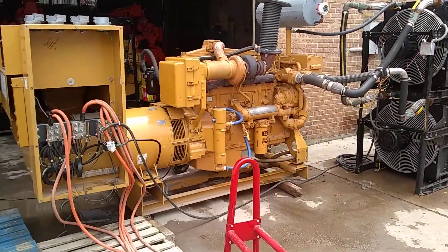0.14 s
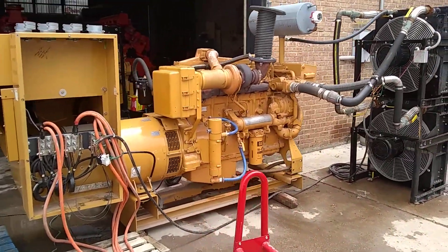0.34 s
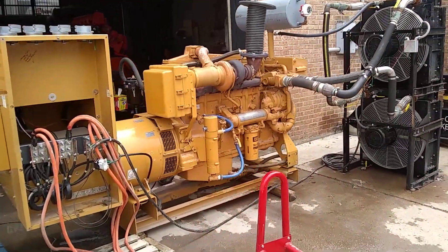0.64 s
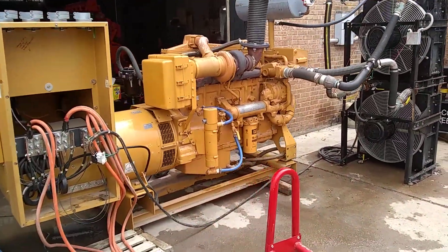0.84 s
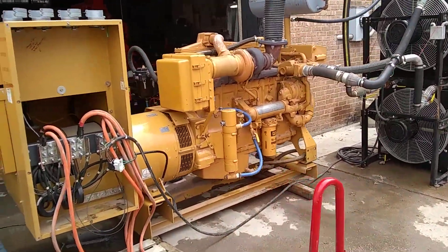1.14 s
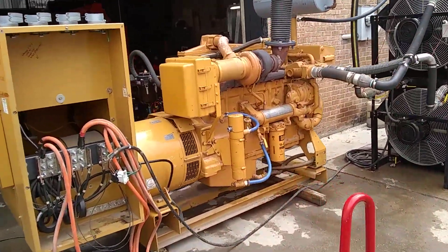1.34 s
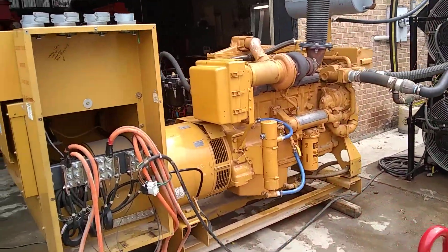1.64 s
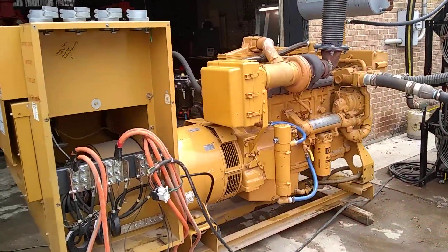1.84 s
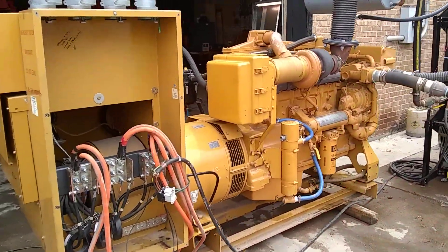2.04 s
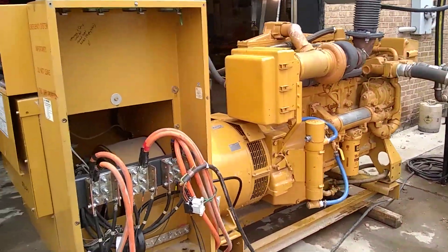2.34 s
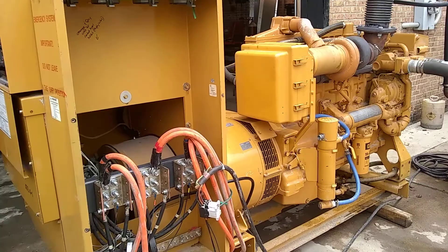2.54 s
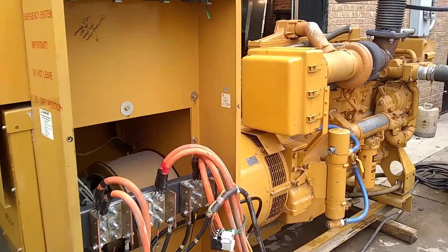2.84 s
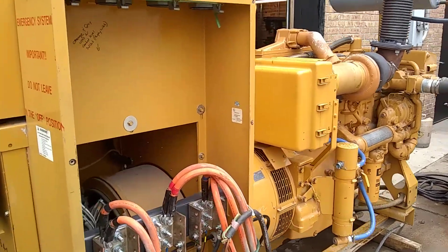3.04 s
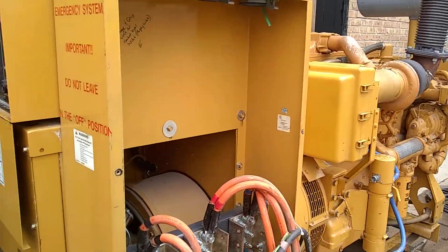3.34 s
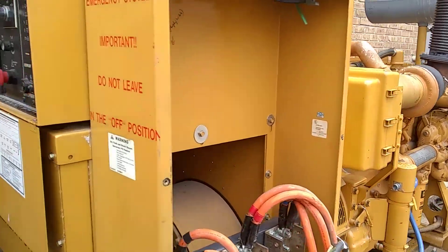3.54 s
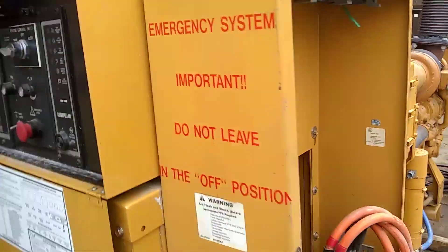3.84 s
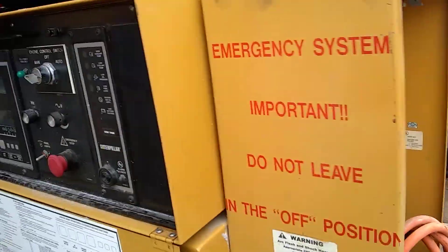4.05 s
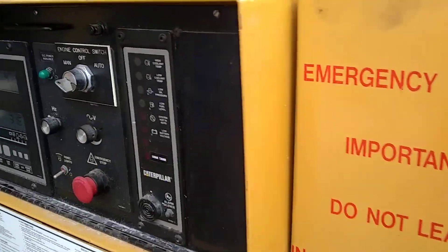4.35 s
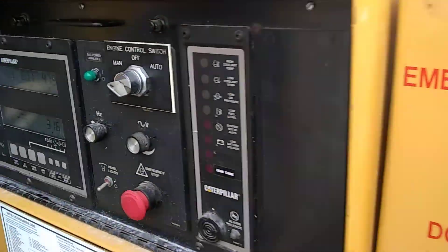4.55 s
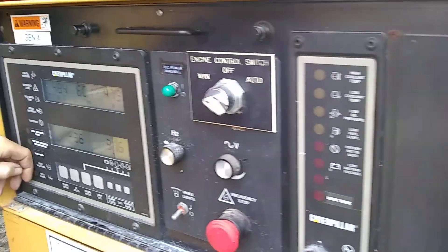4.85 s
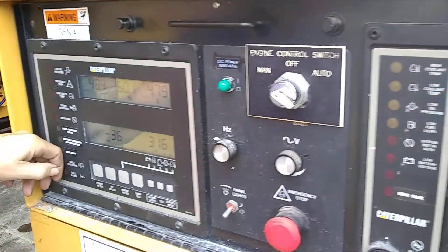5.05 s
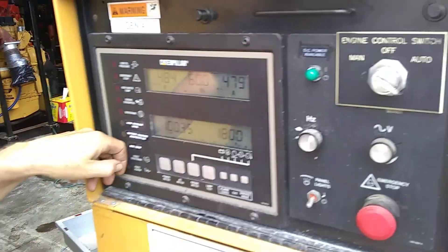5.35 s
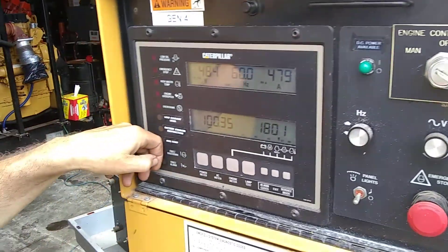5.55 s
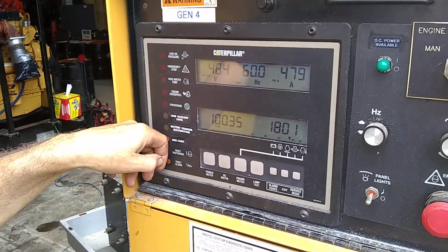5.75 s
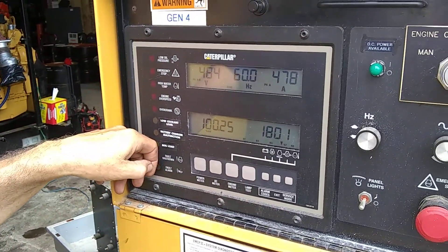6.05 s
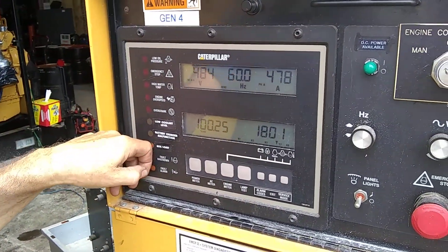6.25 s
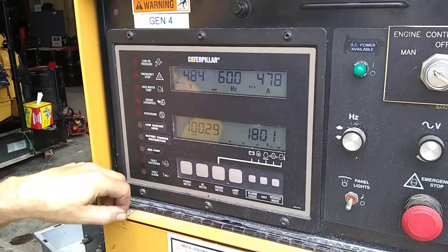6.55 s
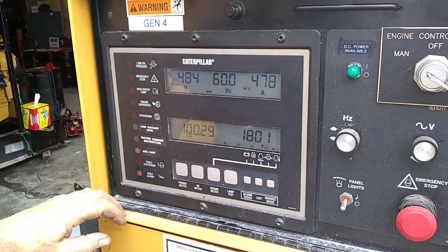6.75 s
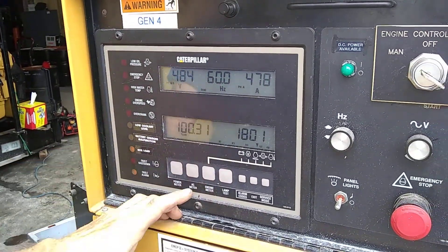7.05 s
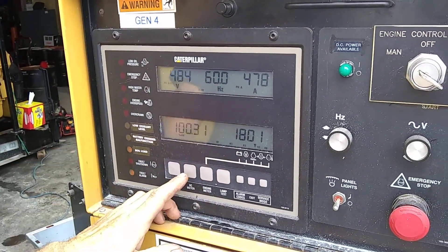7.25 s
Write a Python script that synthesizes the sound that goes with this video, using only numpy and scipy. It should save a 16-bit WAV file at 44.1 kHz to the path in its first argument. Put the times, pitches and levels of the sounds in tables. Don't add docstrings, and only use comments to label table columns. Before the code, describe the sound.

Continuous, very loud diesel engine under load, heard close outdoors on a small handheld stereo device. Deep buzzing drone wavers in strength during the walk, over fluttering mechanical roar, knocking clatter and wide airy hiss. High turbo whoosh is clearest first and dwindles; a boxy resonance swells midway; afterwards a steadier metallic hum leans left. The crests distort and the highest treble is cut off.

```python
import sys
import numpy as np
from scipy import signal
from scipy.fft import rfft, irfft, next_fast_len
from scipy.io import wavfile
from scipy.ndimage import uniform_filter1d, map_coordinates

SR = 44100
rng = np.random.default_rng(int(sys.argv[2]) if len(sys.argv) > 2 else 0)


def boost_factor(decibels):
    exponent = np.asarray(decibels, float) / 20
    return 10 ** exponent


def to_wav(sig):
    pcm = np.clip(np.atleast_2d(sig), -1, 1) * 32767
    pcm = np.round(pcm).astype(np.int16)
    wavfile.write(sys.argv[1], SR, pcm.T)


N = 327222

# t/s, rate/(turns per s)
SHAFT_SPEED = [(0, 30.07), (2, 30.05), (4, 30.01), (5.5, 30.02), (7.42, 30.03)]
# t/s, 6th order level/dB, left minus right/dB, firing order level/dB
HUM_WALK = [(0, -18.5, 0, -27.5), (.6, -24, -5, -28), (.9, -18.5, -1, -27.5), (1.2, -15, 0, -31.5),
            (1.5, -10.7, 1.5, -36.5), (2.1, -10.5, 1, -32), (2.4, -10, 1.5, -29), (3.3, -9, 3, -27),
            (3.6, -9.7, 2, -30), (4.1, -10.5, 8.5, -24.5), (4.8, -12, 9, -25), (5.4, -9.5, 6, -25.5),
            (6.6, -9.5, 6, -24), (7.42, -10, 5, -26.5)]
FIRING_LEAN = (-3, 6.5)
# t/s, level/dB
ENGINE_NEARNESS = [(0.0, -16.5), (0.8, -16.5), (2.33, -18), (3.8, -18.5), (3.82, -18.5), (7.42, -20)]
# f/Hz, density/dB
ROAR_COLOUR = [(20, -40), (60, -10), (120, -8), (200, -2), (320, -2.5), (500, 0), (750, -3.5), (1000, -8),
               (1500, -21.5), (3000, -62)]
# f/Hz, density/dB
CLATTER_COLOUR = [(300, -45), (700, -8), (1100, -2.5), (1600, -2), (2200, 0.5), (3000, -7), (4000, -7),
                  (6000, -15), (12000, -36)]
# f/Hz, width/Hz, level/dB
SUMP_MODES = [
    (650, 140, -2),
    (1120, 420, -13),
]
# f/Hz, density/dB
HISS_COLOUR = [(1500, -64), (3000, -5), (5000, -3.5), (6500, -2), (8200, -2), (9500, 0), (11000, -2),
               (12500, -5.5), (14200, -9), (20000, -30)]
# t/s, level/dB
WHOOSH_WALK = [
    (0, -27.5),
    (1.2, -27),
    (2, -34.5),
    (3.5, -33),
    (5, -62),
    (7.42, -46),
]
# f/Hz, width/Hz, level/dB
INLET_MODES = [
    (7950, 1200, 17),
    (11180, 810, 19),
]
# t/s, share of the way to the panel/1
WALK_SHARE = [
    (0, 0),
    (2.5, .1),
    (4.5, 1),
    (7.42, 1),
]
# shaft order/1, level beside/dB, level at panel/dB, left minus right there/dB
RINGING_ORDERS = [(4, -42, -36, -8), (5, -35, -31.5, -6), (6.5, -24, -33, -3), (7, -20, -27, 11),
                  (7.5, -45, -42, -5), (8, -28.5, -31, 1), (9, -30.5, -25.5, 15), (10, -27, -31, -5),
                  (13, -30.5, -31.5, 7), (13.5, -34, -28.5, 0), (15, -35.5, -23, 5), (16, -26.5, -23, 5),
                  (17, -28.5, -36, 6), (18, -31.5, -27, 11), (19, -33.5, -28.5, 6), (19.5, -24.5, -38, -7),
                  (20, -23.5, -29, 0), (24, -30, -37, 0), (25, -28, -39, 0)]
# f/Hz, level/dB
WEAK_BESIDE_ENGINE = [(15, -65), (75, -62), (105, -50), (250, -37), (600, -31), (840, -35)]
# f/Hz, level/dB
WEAK_AT_PANEL = [(15, -57), (75, -52), (105, -44), (250, -34), (550, -34), (840, -42)]
# f/Hz, width/Hz, level/dB
BOX_MODES = [
    (403, 24, 10),
    (480, 18, 5.5),
]
# f/Hz, likeness/1
PORT_COHERENCE = [(30, .3), (100, .8), (200, .93), (500, .88), (900, .4), (1400, .05), (2000, 0),
                  (14000, 0)]
# f/Hz, level/dB
PORT_TILT = [(100, -1), (1000, 2.5), (4000, -2), (5500, 3), (7500, -7), (8800, -5.5), (10000, -1.5),
             (11500, 7), (12500, -4), (14000, 4)]
# f/Hz, share/1
SUBTRACTED_SHARE = [(100, .95), (2200, .9), (3400, .93), (4500, .8), (5700, .48), (7000, .2), (10000, .2),
                    (13500, .6)]
# f/Hz, angle/rad
LEFT_LEAD = [(30, 0.43), (100, 0.63), (200, 0.77), (400, 0.51), (800, 0.24), (1100, 0.015), (14000, 1)]
# f/Hz, level/dB
HAND_SHADOW = [(1000, 1), (3500, -0.5), (5000, -5.5), (7500, 3.5), (9500, 3), (11000, -1), (13000, -1)]

ROAR_DB, ROAR_FOLLOWS = -16.5, 0.82
CLATTER_DB, CLATTER_FOLLOWS, KNOCK_UNDER_DB = -21.5, 1.2, 12.5
HISS_DB, HISS_FOLLOWS = -17.5, 0.24
THROB = 2
CYLINDERS = 6
HALF_ORDER_DB, SCATTER_DB = -3, 2
FADE_WALKING_DB, FADE_STILL_DB, FADES_A_SECOND = 3.5, 1.5, 4
BOX_S, BOX_LONG_S, BOX_DB = 3.17, 0.65, 1
PORT_HZ = 2275
SIDES = np.array([[.5], [-.5]])


def unit(x):
    return x / np.sqrt(np.mean(x ** 2) + 1e-20)


def along(points, hz):
    f, v = np.transpose(points)
    return np.interp(np.log(hz + 1), np.log(f + 1), v)


def curves(rows):
    s, *cols = np.transpose(rows)
    return [np.interp(np.arange(N) / SR, s, c) for c in cols]


def wobble(rate):
    knots = rng.standard_normal(200 + int(N / SR) * 40)
    return map_coordinates(knots, [np.arange(N) * rate / SR], order=1)


def filtered(x, response):
    m = next_fast_len(N + 8192)
    return irfft(rfft(x, m) * response(np.fft.rfftfreq(m, 1 / SR)), m)[..., :N]


def modes(table):
    def response(f):
        total = 0
        for k, (centre, width, db) in enumerate(table):
            resonance = 1j * f * width / (centre * centre - f * f + 1j * f * width)
            total = total + (-1) ** k * boost_factor(db) * resonance
        return total
    return response


def rush(colour, patchy_db):
    z = signal.stft(rng.standard_normal((2, N + 512)), nperseg=512)[2]
    field = uniform_filter1d(rng.standard_normal(z.shape[1:]), size=6, axis=0)
    field = uniform_filter1d(field, size=10, axis=1)
    pair = signal.istft(z * boost_factor(patchy_db * unit(field)), nperseg=512)[1][:, :N]
    return unit(filtered(pair, colour))


def order(turns, multiple, db, lead, shake):
    angle = 2 * np.pi * (multiple * turns + rng.random()) + shake * wobble(9)
    return np.sqrt(2) * boost_factor(db) * np.sin(angle + lead * SIDES)


def exhaust(turns):
    hum_db, lean_db, firing_db = curves(HUM_WALK)
    past_db = np.interp(np.arange(N) / SR, (1.5, 2.1), FIRING_LEAN)
    hum_db = hum_db + lean_db * SIDES + 0.26 * wobble(14)
    firing_db = firing_db + past_db * SIDES + 0.65 * wobble(8)
    hum = order(turns, multiple=6, db=hum_db, lead=0.88, shake=0.031)
    return hum + order(turns, multiple=3, db=firing_db, lead=1.77, shake=0.087)


def exposure():
    near_db = curves(ENGINE_NEARNESS)[0]
    return near_db - near_db.mean()


def block(turns):
    cycle = turns / 2
    firings = cycle * CYLINDERS
    cylinder_db = np.array([0, -2, -1, 1.5, -2.5, -1])[firings.astype(int) % CYLINDERS]
    burn = boost_factor(cylinder_db) * np.exp(-1.2 * (firings % 1))
    roar_db = ROAR_DB + ROAR_FOLLOWS * exposure() + BOX_DB * box() + .6 * wobble(6)
    roar = unit((THROB + burn) * rush(lambda f: boost_factor(along(ROAR_COLOUR, f)), patchy_db=0.5))
    clatter_db = CLATTER_DB + CLATTER_FOLLOWS * exposure()
    clatter = unit((3 + burn) * rush(lambda f: boost_factor(along(CLATTER_COLOUR, f)), patchy_db=1.5))
    blows = np.diff(np.floor(cycle), prepend=0) * boost_factor(1.0 * wobble(19))
    knock = boost_factor(clatter_db - KNOCK_UNDER_DB) * unit(filtered(blows, modes(SUMP_MODES)))
    clatter = boost_factor(clatter_db + 4.5 + 0.56 * wobble(6.5)) * clatter
    return boost_factor(roar_db) * roar + clatter + knock * [[1], [0]]


def turbo(turns):
    breath_db = .3 * np.sin(2 * np.pi * turns) + .35 * np.sin(2 * np.pi * CYLINDERS / 2 * turns)
    hiss_db = HISS_DB + HISS_FOLLOWS * exposure() + breath_db + 0.35 * wobble(18)
    hiss = boost_factor(hiss_db) * rush(lambda f: boost_factor(along(HISS_COLOUR, f)), patchy_db=1.0)
    low, high = rush(lambda f: np.array([modes([mode])(f) ** 2 for mode in INLET_MODES]), patchy_db=1)
    return hiss + boost_factor(curves(WHOOSH_WALK)[0]) * np.array([high + low, high - low])


def casing(turns):
    way, passing = curves(WALK_SHARE)[0], box()
    depth = FADE_WALKING_DB * (1 - way) + FADE_STILL_DB * way
    taken = (3, 6, *[row[0] for row in RINGING_ORDERS])
    weak = []
    for k in np.arange(1, 57) / 2:
        near, far = SCATTER_DB * rng.standard_normal(2)
        if k not in taken:
            beside_db = along(WEAK_BESIDE_ENGINE, 30 * k) + near
            panel_db = along(WEAK_AT_PANEL, 30 * k) + far + HALF_ORDER_DB * (k % 1 > 0)
            weak.append((k, beside_db, panel_db, 0))
    out = np.zeros((2, N))
    for rows, shake, apart in ((RINGING_ORDERS, .25, .6), (weak, .3, 1.5)):
        for k, near_db, far_db, lean_db in rows:
            fade = depth * (wobble(FADES_A_SECOND) + apart * wobble(FADES_A_SECOND) * SIDES)
            fade += passing * sum(db * np.exp(-((30 * k - hz) / wide) ** 2) for hz, wide, db in BOX_MODES)
            panel_db = far_db + lean_db * np.array([[.4], [-.6]])
            db = near_db * (1 - way) + panel_db * way + fade
            out += order(turns, k, db, lead=0.81, shake=shake)
    return out


def box():
    return np.exp(-((np.arange(N) / SR - BOX_S) / BOX_LONG_S) ** 2)


def ports(pair):
    def mix(f):
        turn = np.arccos(np.clip(along(PORT_COHERENCE, f), -1, 1)) / 2
        tilt = boost_factor(along(PORT_TILT, f) / 2)
        first = tilt * np.array([np.cos(turn), np.sin(turn)])
        second = np.array([np.cos(turn), -np.sin(turn)]) / tilt
        late = np.clip(along(SUBTRACTED_SHARE, f), 0, 1) * np.exp(-2j * np.pi * f / PORT_HZ)
        both = np.array([first - late * second, second - late * first])
        both *= np.exp(1j * along(LEFT_LEAD, f) * SIDES[..., None])
        both *= boost_factor(along(HAND_SHADOW, f) * SIDES[..., None])
        return both / np.sqrt(np.sum(abs(both) ** 2, axis=(0, 1)) / 2)
    return filtered(pair[None], mix).sum(axis=1)


def scene():
    turns = np.cumsum(curves(SHAFT_SPEED)[0]) / SR
    tones = exhaust(turns) + casing(turns)
    duck = 1 / (1 + 1.4 * tones[0] ** 2)
    return tones + ports(1.114 * duck * (block(turns) + turbo(turns)))


def band_limit(x):
    return signal.sosfilt(signal.butter(12, 14270, fs=SR, output="sos"), x)


def record(dry):
    hard = 9
    mix = dry / (1 + abs(dry / 1.2) ** hard) ** (1 / hard)
    mix = np.clip(mix, -1, 1)
    return band_limit(mix)


dry = scene()
out = record(dry)
to_wav(out)
```